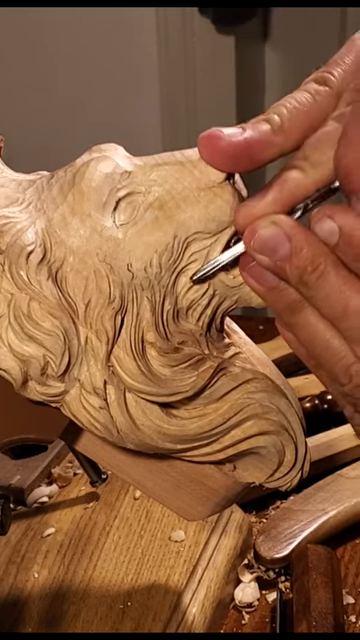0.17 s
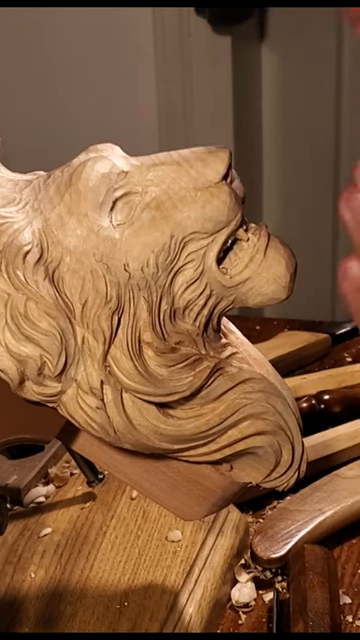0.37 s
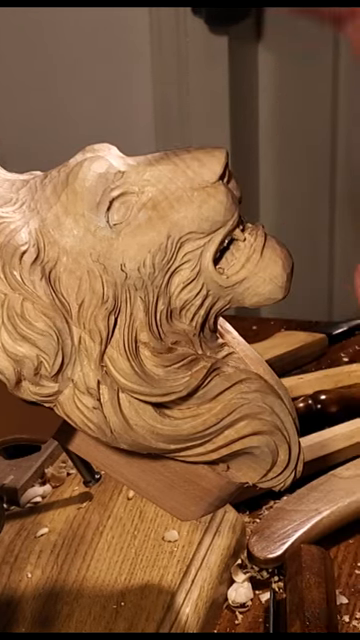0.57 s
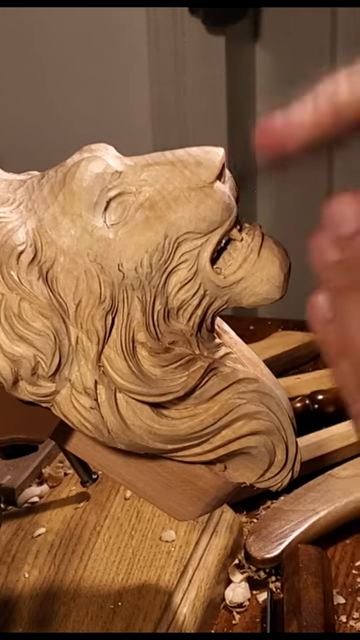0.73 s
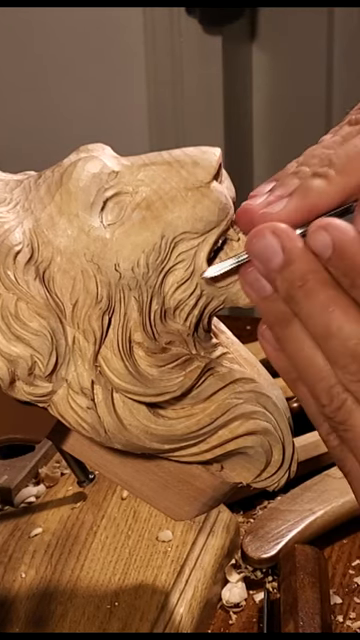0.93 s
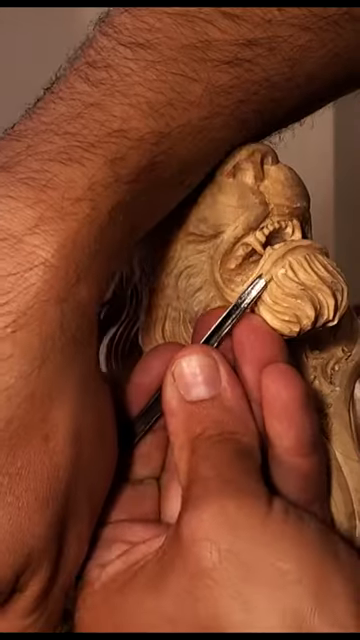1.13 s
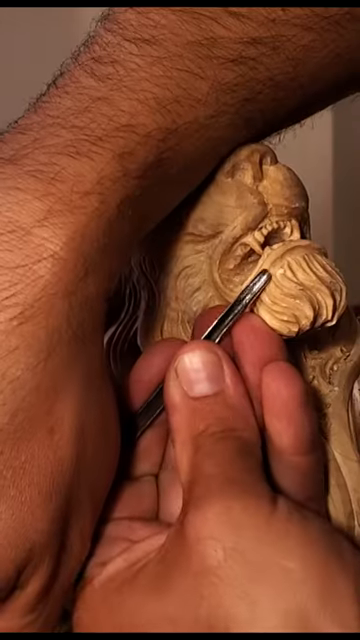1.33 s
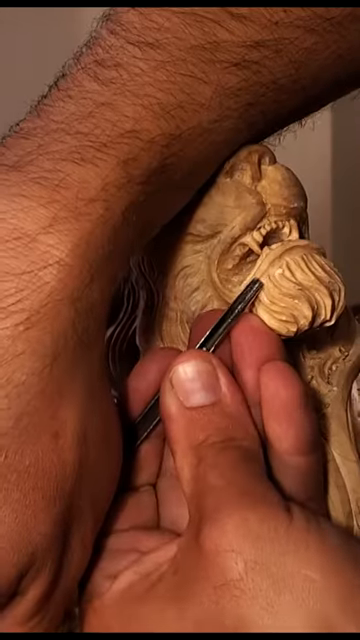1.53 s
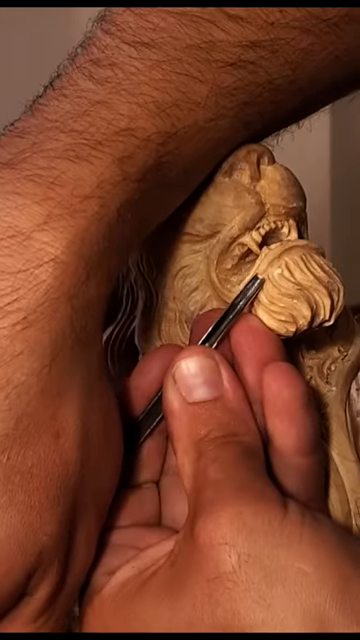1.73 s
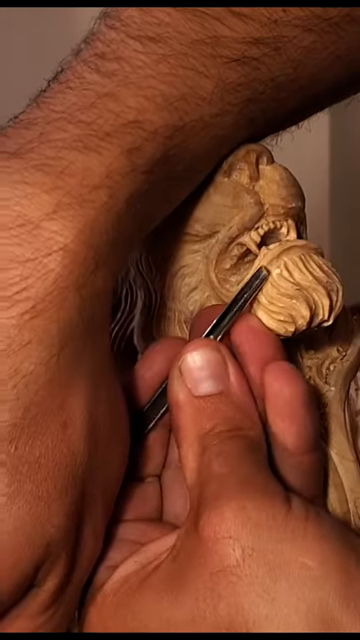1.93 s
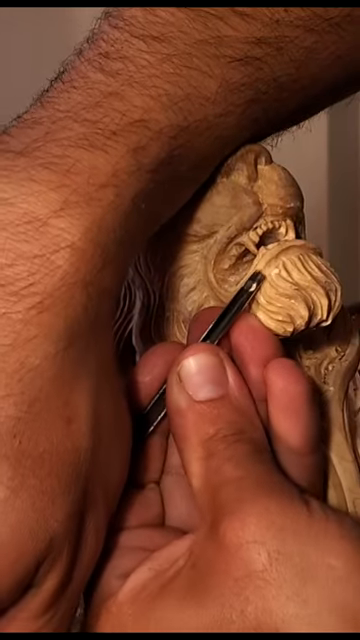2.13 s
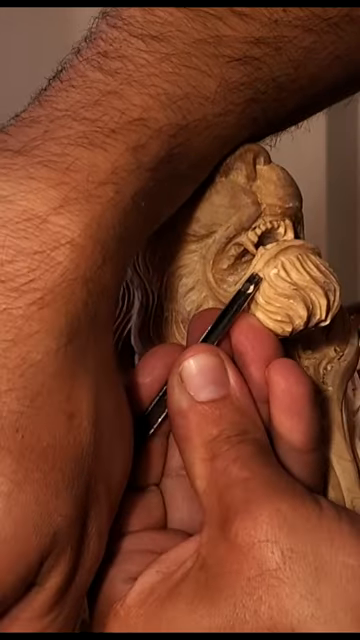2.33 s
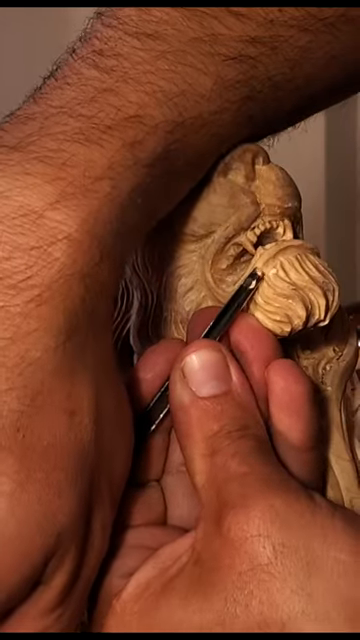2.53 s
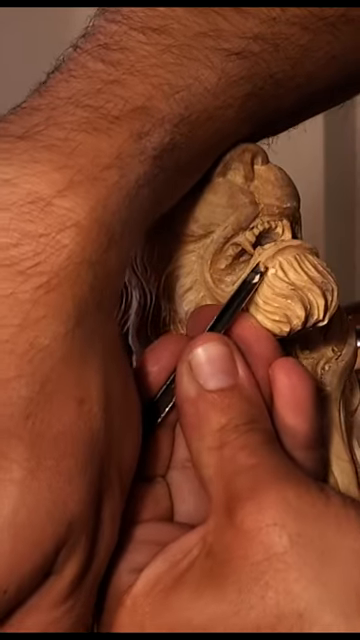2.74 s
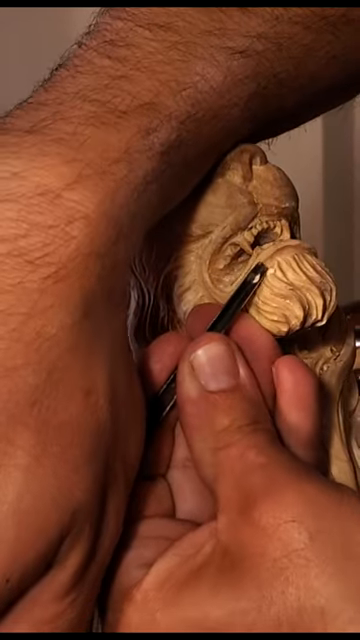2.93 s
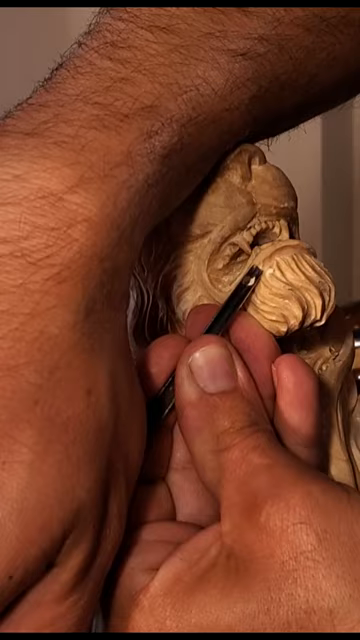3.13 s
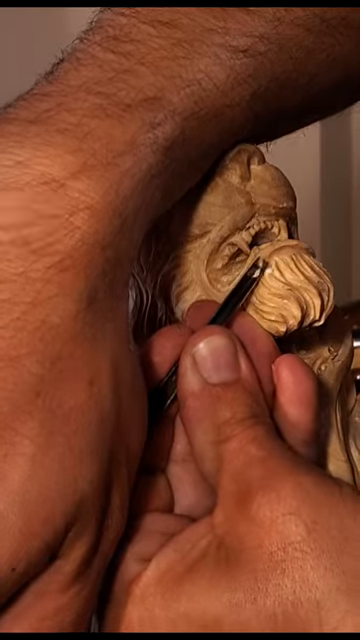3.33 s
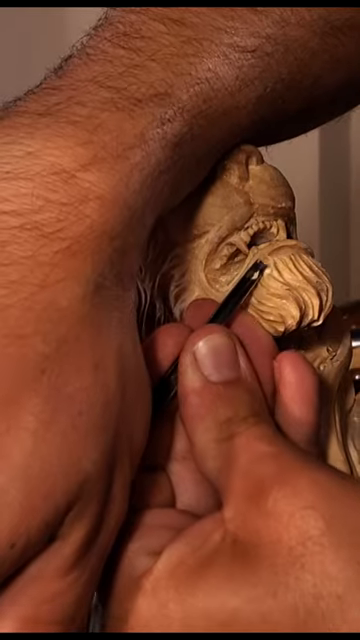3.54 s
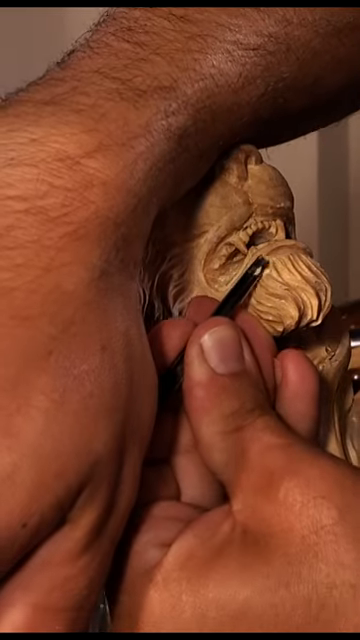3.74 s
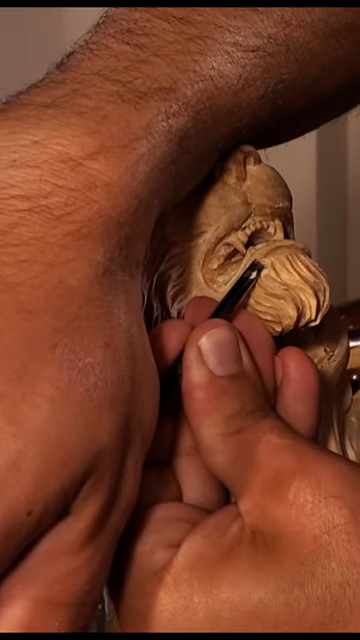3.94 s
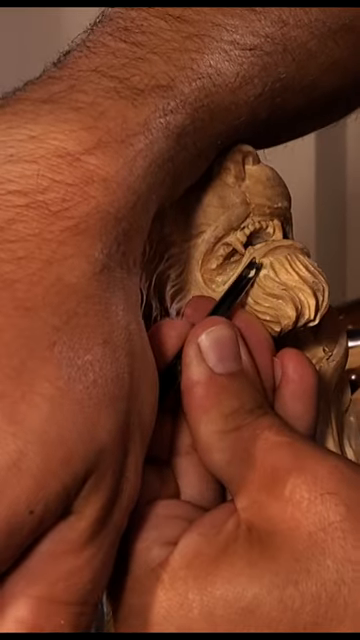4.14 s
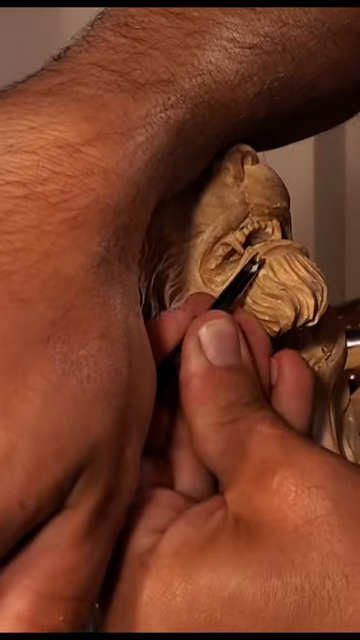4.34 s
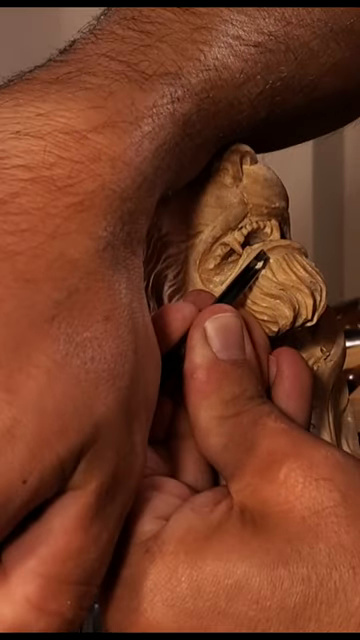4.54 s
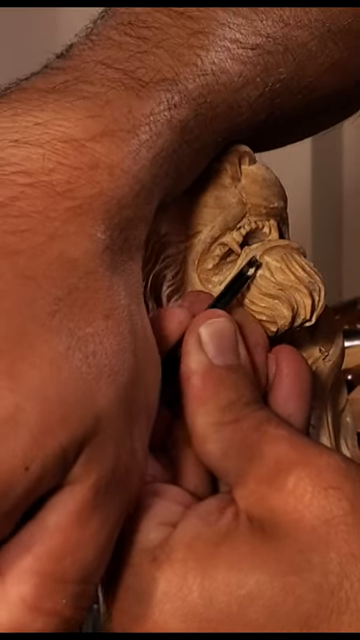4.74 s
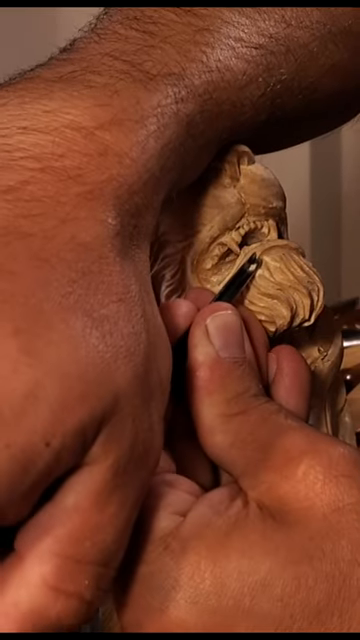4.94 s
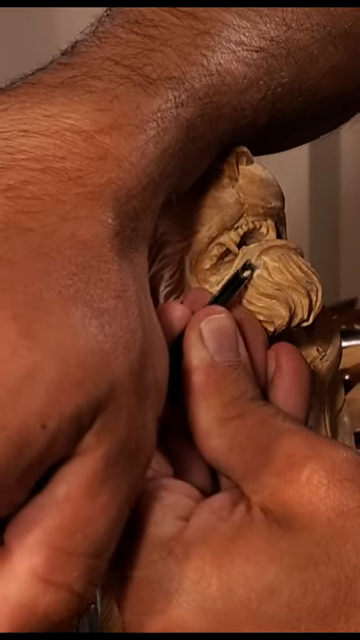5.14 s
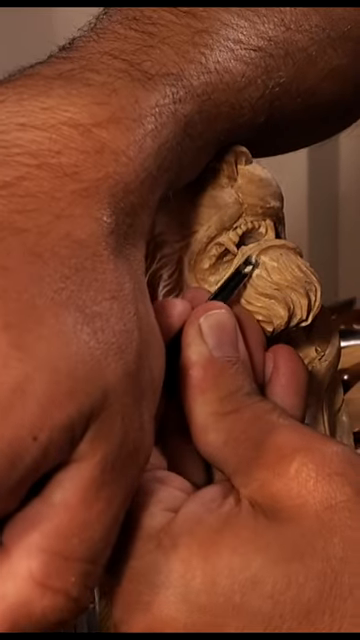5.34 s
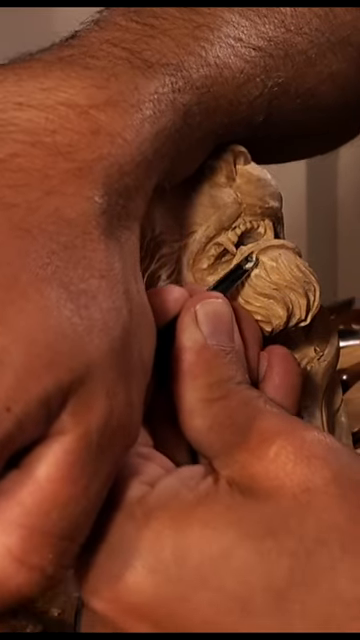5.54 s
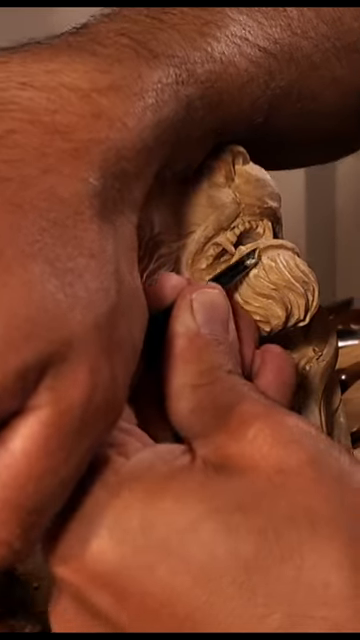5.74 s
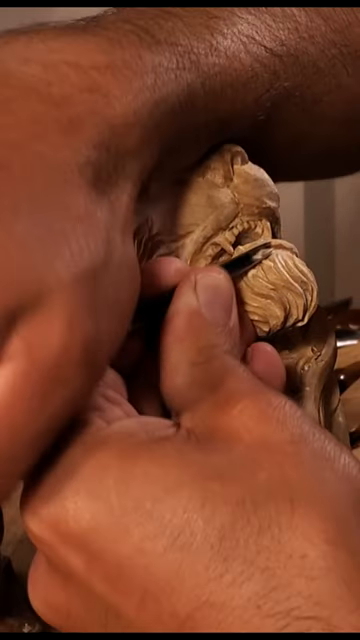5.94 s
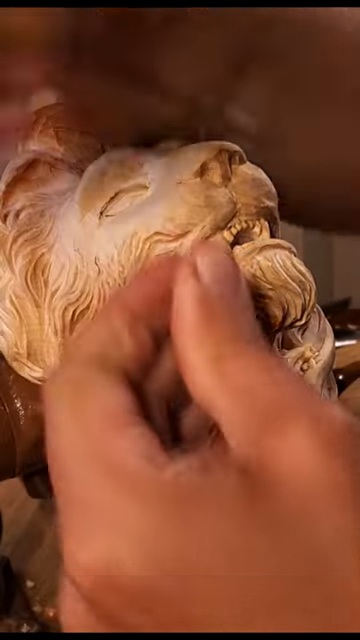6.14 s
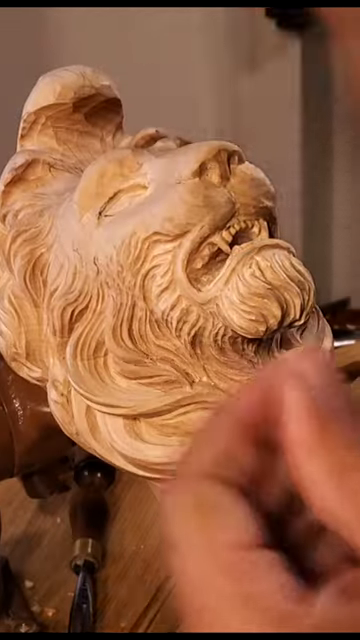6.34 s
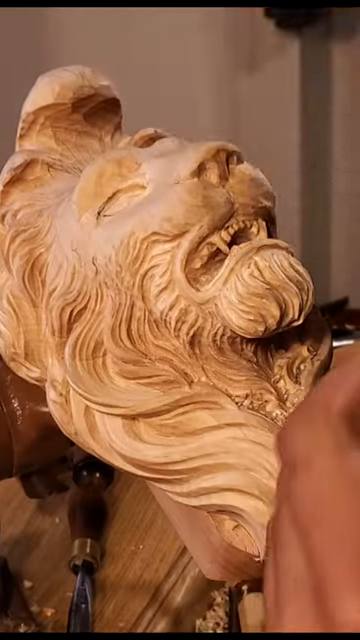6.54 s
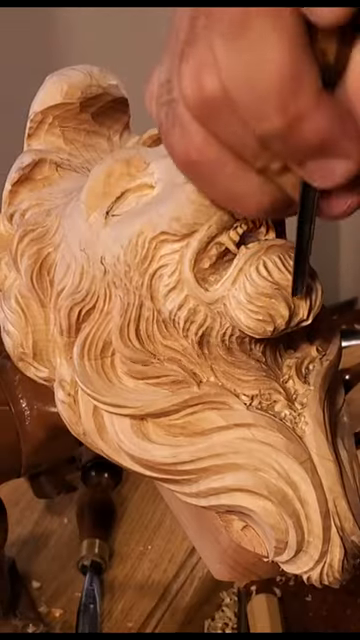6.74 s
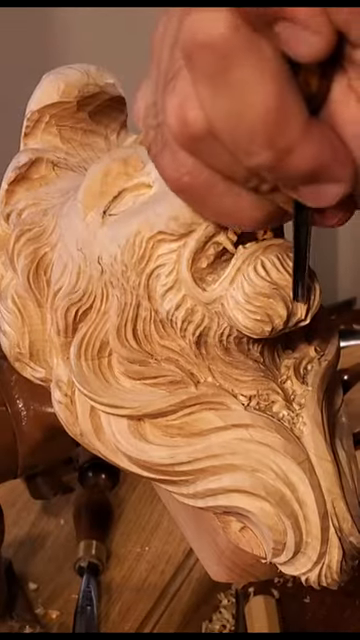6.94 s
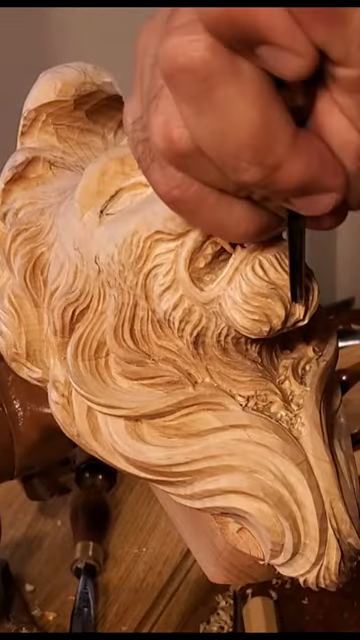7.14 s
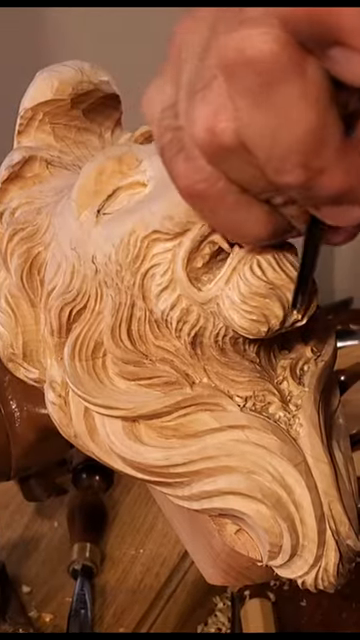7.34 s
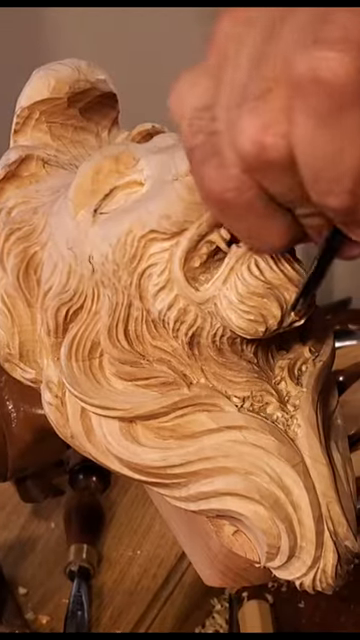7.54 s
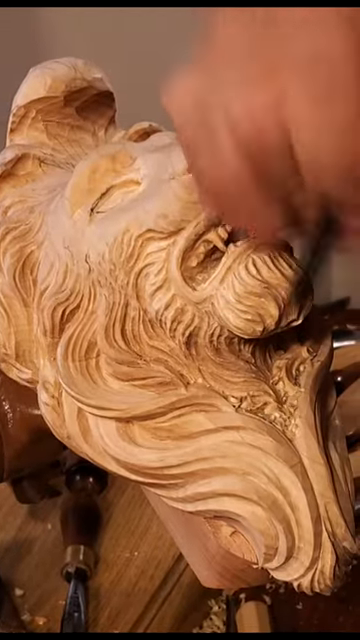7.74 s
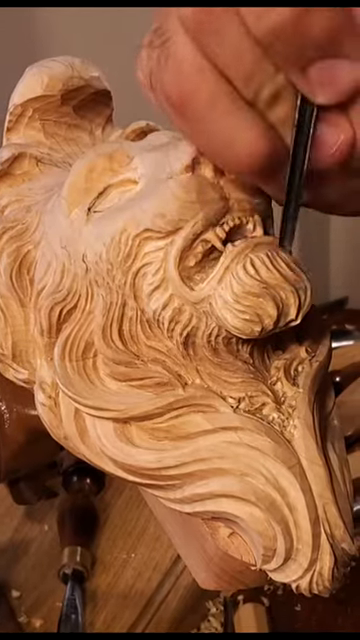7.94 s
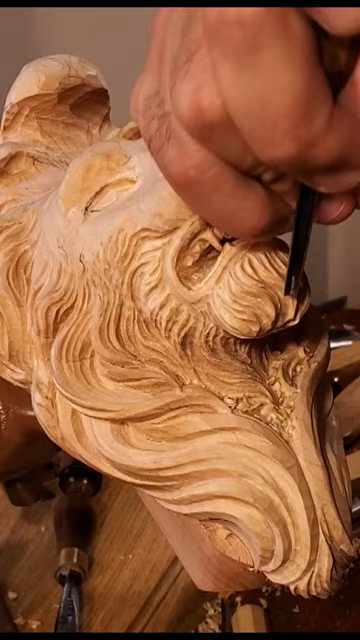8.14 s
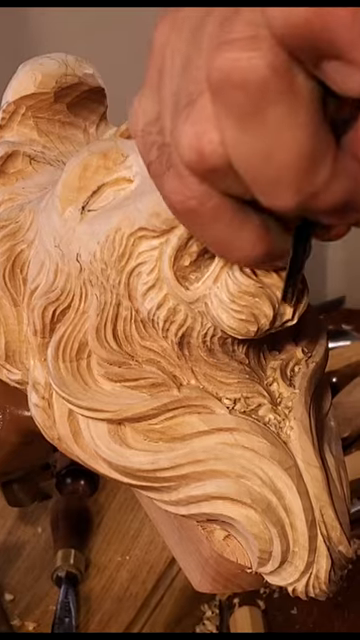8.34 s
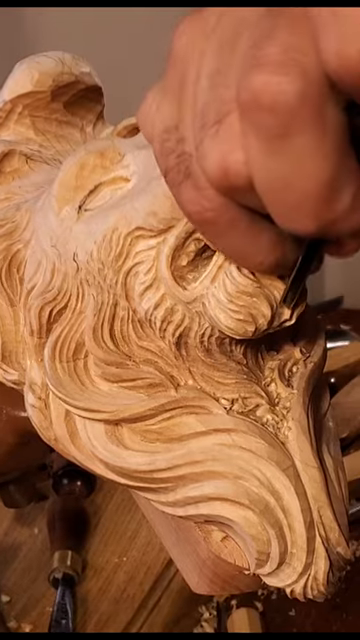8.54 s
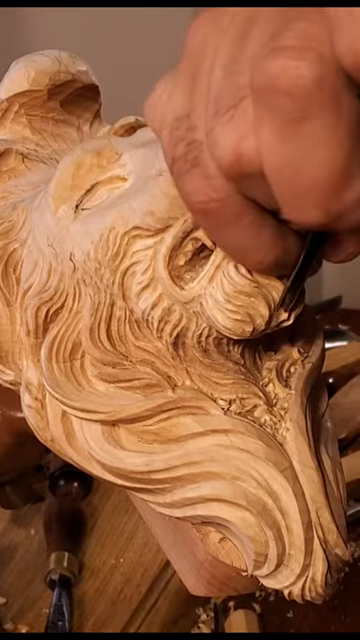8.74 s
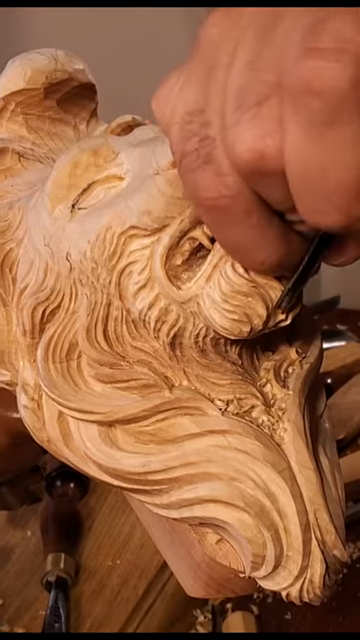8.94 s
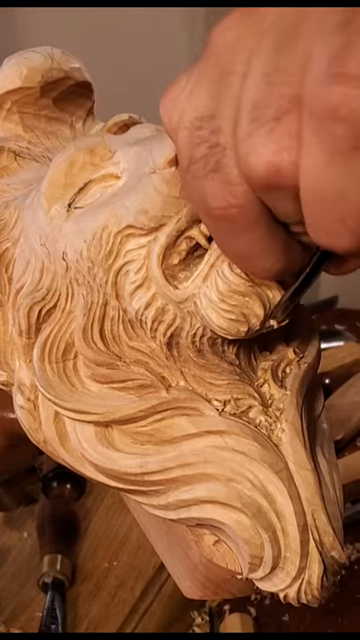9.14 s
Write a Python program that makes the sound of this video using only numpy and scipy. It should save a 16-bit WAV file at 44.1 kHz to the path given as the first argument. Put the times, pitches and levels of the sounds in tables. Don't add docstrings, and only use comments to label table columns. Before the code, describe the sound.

Very close to the microphone in a small quiet room, a hand gouge scrapes through a carved wooden block. After a brief opening rub and a pause, short gritty cuts come in irregular bursts, with tearing fibres and dull bench thumps. A clear tap interrupts around five seconds; cutting then strengthens, stops for soft handling clicks, and returns with a few sharp, abrupt bites.

```python
import sys
import numpy as np
from scipy import signal
from scipy.fft import rfft, irfft, next_fast_len
from scipy.io import wavfile
from scipy.ndimage import uniform_filter1d, map_coordinates

SR = 44100
rng = np.random.default_rng(int(sys.argv[2]) if len(sys.argv) > 2 else 0)


def volts_from_db(level):
    exponent = np.asarray(level, float) / 20
    return 10 ** exponent


def unload_audio(sound):
    columns = np.transpose(np.atleast_2d(sound))
    steps = np.round(np.clip(columns, -1, 1) * 32767)
    wavfile.write(sys.argv[1], SR, steps.astype(np.int16))


N = 409688

TURNS_S = [
    1.0,
    6.7,
]


def unit(x):
    return x / np.sqrt(np.mean(x ** 2) + 1e-20)


def along(points, hz):
    point_hz, value = np.transpose(points)
    return np.interp(np.log(hz + 1), np.log(point_hz + 1), value)


def filtered(x, response):
    size = next_fast_len(N + SR // 2)
    return irfft(rfft(x, size) * response(np.fft.rfftfreq(size, 1 / SR)), size)[..., :N]


def wobble(rate_hz):
    knots = rng.standard_normal(int(N * rate_hz / SR) + 4)
    return map_coordinates(knots, [np.arange(N) * rate_hz / SR])


def clock():
    return np.arange(0, N / SR + .002, .001)


def glide(levels):
    return np.interp(np.arange(N) / SR * 1000, np.arange(len(levels)), levels)


def setup():
    return np.searchsorted(TURNS_S, np.arange(N) / SR)


def resonate(force, setups, slope):
    f = np.fft.rfftfreq(2 ** 13, 1 / SR) + 1e-6

    def pole(centre_hz, width_hz):
        return 1 / (1 + 1j * (f * f - centre_hz * centre_hz) / (f * width_hz))

    out = np.zeros(N + SR)
    edges = [0, *(round(s * SR) for s in TURNS_S), N]
    for modes, a, b in zip(setups, edges, edges[1:]):
        response = 0
        for j, (hz, width_hz, db) in enumerate(modes):
            response = response + (-1) ** j * volts_from_db(db) * pole(hz, width_hz) * pole(hz, slope * hz)
        h = irfft(response)
        out[a:b + len(h) - 1] += signal.oaconvolve(force[a:b], h / np.linalg.norm(h))
    return out[:N]


def hush():
    # frequency [Hz], density [dB per Hz].
    hush_spectrum = [(15, -29), (30, 0), (64, 1.5), (150, -7), (300, -12.5), (700, -19), (1500, -24.5),
                     (4000, -27), (10000, -29), (16000, -30)]
    return volts_from_db(-70.5) * unit(filtered(rng.standard_normal(N), lambda hz: volts_from_db(along(hush_spectrum, hz))))


def effort(lag_s=0, rings_db_s=2000):
    # bite [s], hardest [s], release [s per 30 dB],
    # bite level [dB], hardest level [dB].
    surges = [(0.016, 0.06, 0.1, -73, -61.5), (0.258, 0.282, 0.1, -80, -71),
              (1.152, 1.263, 0.0757, -66, -54), (1.672, 1.694, .4, -72, -65),
              (1.7, 1.774, 0.15, -60, -52.5), (1.823, 1.979, 0.05, -59.5, -45.5),
              (2.411, 2.665, .5, -65, -53), (2.756, 2.823, 0.0569, -55.5, -47.5),
              (3.203, 3.385, 0.0769, -66, -46), (3.752, 3.8, 0.08, -68, -62), (4.159, 4.215, .25, -61, -56),
              (4.288, 4.304, 1, -58, -55), (4.358, 4.45, 0.13, -56.5, -52.5), (4.535, 4.554, .05, -67, -60),
              (4.906, 4.969, 0.13, -71, -63), (5.272, 5.405, 0.3, -68, -55.5),
              (5.5, 5.546, 0.5, -67.5, -60.5), (5.598, 5.708, 0.34, -61, -50),
              (5.807, 5.908, 0.1, -57.5, -40), (7.188, 7.299, 0.15, -71, -51), (7.4, 7.449, .5, -75, -75),
              (7.609, 7.645, 0.17, -63, -39), (8.539, 8.586, 0.15, -75, -67.5),
              (8.68, 8.701, 0.19, -63.5, -56.5), (9.025, 9.09, .3, -56, -55.5),
              (9.098, 9.16, 0.06, -54, -39.5)]
    bite_s = 0.045
    t = clock()
    ends = [row[1] for row in surges[1:]] + [N / SR + 1]
    levels = []
    for (s, top, release, bite_db, db), end in zip(surges, ends):
        knots_s = (s - bite_s, s, top, top + lag_s, top + lag_s + 3 * release)
        surge_db = np.interp(t, knots_s, (-110, bite_db, db, db, db - 90))
        levels.append(np.where(t < end, surge_db, -110))
    fall_db = rings_db_s * t
    return glide(np.maximum.accumulate(np.max(levels, axis=0) + fall_db) - fall_db)


def depth():
    # time [s], wood over steel [dB].
    wood_over_steel = [(.07, 10), (.29, 2.5), (1.25, 2.5), (1.33, 13.5), (1.7, -0.5), (2.66, 6.5),
                       (2.83, -0.5), (3.4, 4), (3.8, -2.5), (4.3, 6.5), (4.58, 0), (5.4, 7.5), (5.9, 0),
                       (7.3, 5.5), (7.65, 2), (8.65, 6), (9.03, -5), (9.2, -5.5)]
    return np.interp(np.arange(N) / SR, *np.transpose(wood_over_steel))


def fibres(rate_hz, spread_db, smooth):
    hits = rng.random(N) < rate_hz / SR
    snaps = hits * volts_from_db(spread_db * rng.exponential(size=N)) * rng.standard_normal(N)
    return unit(unit(snaps) + smooth * rng.standard_normal(N))


def tearing(t60_s):
    # time [s], peak [dB].
    tears = [(1.1667, -47), (1.7419, -48), (1.7654, -46), (1.95, -42), (2.4528, -48), (2.7282, -46),
             (2.7571, -44), (2.8145, -40), (1.8856, -41), (1.97, -44), (2.564, -38), (2.6, -33.5),
             (2.6514, -33), (2.7906, -40), (3.2246, -50), (3.254, -46), (3.3064, -44), (3.3503, -36),
             (3.365, -33.5), (4.1909, -48), (5.3637, -46), (4.156, -48), (4.2974, -36), (4.36, -39),
             (5.694, -35), (5.7169, -40), (5.8566, -40), (5.7902, -34), (5.819, -36), (5.874, -41),
             (5.894, -39), (7.22, -41), (7.276, -29), (7.321, -33.5), (7.632, -27), (7.6785, -36),
             (8.6941, -48), (9.127, -33.5)]
    jumps = np.zeros(N)
    for s, db in tears:
        jumps[round(s * SR)] = volts_from_db(db - 22.5)
    t = np.arange(SR // 4) / SR
    decay = volts_from_db(-60 * t / t60_s) * (1 - np.exp(-t / 0.0008))
    return np.abs(signal.oaconvolve(jumps, decay)[:N])


def shifting(x, depth_db):
    z = signal.stft(x, nperseg=512)[2]
    field = uniform_filter1d(rng.standard_normal(z.shape), size=5, axis=0)
    field = uniform_filter1d(field, size=12, axis=1)
    return signal.istft(z * volts_from_db(depth_db * unit(field)), nperseg=512)[1][:N]


def gouge():
    # centre [Hz], width [Hz], level [dB].
    edge_modes = [
        [(3900, 700, -4), (6230, 710, -3), (7550, 860, -0.5)],
        [(1702, 46, 8.5), (2850, 130, -7), (3300, 300, -7), (3720, 260, -2), (4020, 300, -2), (4420, 300, -2),
         (4800, 280, -1), (5080, 200, -1.5), (5480, 230, -1.5), (5840, 270, 1), (6760, 150, -13),
         (7300, 260, -8)],
        [(2780, 130, -3), (3260, 200, -5), (3750, 150, -1), (4030, 130, -1), (4450, 300, -3), (4950, 100, 0),
         (6090, 670, -5.5), (7400, 110, -1), (7470, 440, -6)],
    ]
    # centre [Hz], width [Hz], level [dB].
    sizzle_modes = [
        [(8000, 300, -8), (9500, 700, 7), (12500, 1500, -3.5), (14800, 1500, -10)],
        [(7850, 300, -1), (8650, 450, -2), (9590, 350, 0), (10760, 800, -8), (12440, 800, -7),
         (13300, 700, -12), (14700, 800, -9)],
        [(8300, 83, -1.5), (9460, 380, 1), (10280, 1200, -0.5), (12120, 320, -1.5), (13000, 400, -1.3),
         (14700, 240, -2)],
    ]
    # centre [Hz], width [Hz], level [dB].
    block_modes = [
        [(650, 260, 2.5), (1550, 103, -2.5), (2100, 190, -10.5)],
        [(541.6, 81, 3.5), (764, 126, 3), (899, 50, 2), (1122, 131, -1), (1480, 140, -28), (2310, 100, -26)],
        [(567, 47, 1), (710, 66, -23), (980, 46, -2.5), (1152, 95, 1), (1440, 133, -7), (1990, 130, -26)],
    ]
    sizzle_db, sizzle_growth = (0.5, -18.5, -7.5), 0.19
    edge_db = effort()
    block_db = effort(lag_s=0.0089, rings_db_s=453) + depth()
    clumps = volts_from_db(.8 * wobble(25) + 2.2 * wobble(90) - 5)
    grain = fibres(rate_hz=3000, spread_db=2.0, smooth=1.3)
    tears = tearing(t60_s=0.079)
    edge_force = (volts_from_db(edge_db) * clumps + tears) * grain
    block_force = (volts_from_db(block_db) * clumps + 0.44 * tears) * grain
    bright = volts_from_db(np.take(sizzle_db, setup()) + sizzle_growth * (np.maximum(edge_db, -70) + 49))
    ringing = resonate(edge_force, edge_modes, slope=0.7)
    ringing += resonate(edge_force * bright, sizzle_modes, slope=0.24)
    ringing += resonate(block_force, block_modes, slope=0.55)
    return shifting(ringing, depth_db=2.36)


def bench():
    # time [s], rocking [dB], swell [s], fade [s per 20 dB].
    leans = [(.005, -48, .05, .04), (.09, -39, 0.05, .09), (.18, -50, .05, .12), (.3, -52.5, 0.066, 0.21),
             (1.13, -44.5, 0.038, 0.2), (1.26, -40.5, 0.12, 0.27), (1.8, -49.5, 0.095, 0.3),
             (1.9, -45, .08, 0.13), (2.0, -43.5, .05, .18), (2.46, -51, 0.05, 0.33),
             (2.57, -41, 0.065, 0.21), (2.72, -43, .1, .2), (2.82, -47, .08, 0.23), (3.3, -44, 0.077, .1),
             (3.42, -43.5, .07, .16), (3.92, -63, 0.21, .4), (4.36, -38, .2, 0.28), (4.98, -50, .07, 0.33),
             (5.2, -59, .05, 0.5), (5.44, -43.5, 0.13, 0.16), (5.76, -53, 0.17, 0.2), (5.95, -52, .12, .12),
             (6.15, -56, 0.087, .1), (7.3, -42.5, .1, 0.17), (7.45, -44, .12, 0.19), (7.63, -42, .05, .08),
             (7.705, -27.5, 0.04, 0.14), (7.96, -51, .06, 0.06), (8.41, -54, 0.065, 0.2),
             (8.59, -48, .12, 0.2), (8.76, -45.5, 0.094, 0.1), (8.96, -43.5, 0.063, 0.2),
             (9.16, -29.5, 0.08, 0.06), (9.25, -48, .05, .1)]
    # centre [Hz], width [Hz], level [dB].
    board_modes = [
        [(179, 20, -17), (275, 21, 8), (347, 25, -23), (420, 23, 0)],
        [(188.8, 29.7, 1), (270.7, 21.5, 1.5), (307.3, 39, -3.5), (387, 17.4, -1.5), (472, 63, -12.5),
         (562, 69, -13), (762, 300, -23.5)],
        [(199.5, 9.1, -3), (265, 16.4, -3.5), (325.1, 10.9, 3.5), (385, 14.4, -3), (445, 66, -12),
         (596, 84, -16.5), (728, 600, -21.5)],
    ]
    # centre [Hz], width [Hz], level [dB].
    leg_modes = [
        [(132, 36, 0)],
        [(137.1, 16.3, 3.5), (154.7, 60, -8)],
        [(139.7, 42, -0.5), (110, 15, -2.5)],
    ]
    shake_modes = [(30.2, 17, -6.0), (48, 12, -15.5), (69.9, 17, 7), (101, 14, -8)]
    boards_db, legs_db = (3, 0, -1), (-5, -5, -9)
    t = clock()
    levels = []
    for s, db, swell, fade in leans:
        rise = ((s - t) / swell) ** 2
        fall = ((t - s).clip(0) / fade) ** 1.29
        levels.append(db - 20 * np.where(t < s, rise, fall))
    rocking_db = glide(np.max(levels, axis=0))
    turns = np.cumsum(71.6 + 2.604 * wobble(9)) / SR
    rocking = volts_from_db(rocking_db + 2.2 + 1.0 * wobble(18)) * np.sin(2 * np.pi * turns)
    shake = resonate(volts_from_db(rocking_db - 9) * rng.standard_normal(N), [shake_modes] * 3, slope=.8)

    push_db = effort(lag_s=0.027, rings_db_s=330) + depth() + 45
    boards = volts_from_db(np.take(boards_db, setup()) + 1.027 * push_db - 45) + volts_from_db(rocking_db - 19.5)
    legs = volts_from_db(np.take(legs_db, setup()) + 0.77 * push_db - 44.5) + volts_from_db(rocking_db - 17.5)
    shove = volts_from_db(0.98 * wobble(30)) * rng.standard_normal(N)
    rumble = resonate(legs * shove, leg_modes, slope=.6) + resonate(boards * shove, board_modes, slope=0.69)
    return rocking + shake + rumble


def spray(contacts, octaves, t60_s, rise_s, bend):
    out, t = np.zeros(N + SR), np.arange(SR // 3) / SR
    f = np.fft.rfftfreq(len(t), 1 / SR) + 1
    decay = volts_from_db(-60 * (t / t60_s) ** bend) + 1.6 * volts_from_db(-60 * t / 0.0093)
    shape = decay * (1 - np.exp(-(t / rise_s) ** 2))
    for s, db, hz in contacts:
        band = np.exp(-.5 * (np.log2(f / hz) / octaves) ** 2)
        burst = irfft(rfft(rng.standard_normal(len(t))) * band, len(t)) * shape
        out[round(s * SR):][:len(t)] += volts_from_db(db - 9) * unit(burst) * shape.std()
    return out[:N]


def ticks():
    # time [s], peak [dB], centre [Hz].
    clicks = [
        (.0243, -52, 9300),
        (.276, -57, 5770),
        (4.88, -65, 13000),
        (5.989, -62, 11000),
        (8.24, -68, 4540),
        (8.365, -66, 5200),
        (8.534, -64, 4000),
        (8.5804, -54, 4700),
        (5.157, -42, 4600),
        (6.2495, -50, 6000),
    ]
    slaps = [
        (1.0993, -54, 745),
        (4.022, -64, 2540),
        (6.2502, -48.5, 6150),
        (6.452, -56, 2000),
        (8.889, -67, 4000),
    ]
    taps = [
        (1.1005, -59, 4960),
        (4.02, -59, 1200),
        (5.157, -45, 4000),
        (5.161, -50.5, 1600),
        (5.165, -58, 420),
        (8.365, -68, 1180),
        (9.0225, -47, 1294),
        (9.022, -56, 2100),
    ]
    rings = [
        (.04, -59, 1550),
        (.274, -63, 4350),
        (6.2508, -57, 4600),
        (7.21, -39.5, 332),
    ]
    thuds = [(4.038, -41, 208), (4.95, -35, 138), (1.79, -33, 140), (1.89, -32, 140), (5.42, -34, 140),
             (7.74, -30.5, 138), (5.17, -36, 160), (6.458, -34.5, 199), (6.51, -40, 200), (6.5, -38.5, 126),
             (1.098, -45, 246), (1.098, -47.5, 500), (5.165, -40.5, 280), (5.21, -41, 223), (6.1, -47, 140),
             (4.41, -30.5, 137), (4.5, -38, 140), (6.17, -52, 250), (6.465, -47, 90), (7.68, -29.5, 140),
             (4.04, -45, 110)]
    brushes = [(8.88, -61, 3600), (7.77, -43, 560), (7.87, -55, 500), (.27, -48, 270), (9.125, -39, 1300),
               (7.45, -54.5, 1160), (8.74, -54, 1280), (8.54, -58, 1050), (5.38, -42, 250),
               (4.5, -45.5, 280), (6.11, -62, 2600), (6.1, -53, 1200), (6.1, -59, 9600), (6.11, -52, 490),
               (6.45, -52, 376)]
    scrapes = [(9.125, -35.5, 3700), (6.11, -58, 5600), (6.1, -57, 3500), (6.45, -51, 2600),
               (6.452, -53, 1900), (5.88, -46, 3200), (7.64, -45, 1800), (6.46, -58, 5200),
               (8.68, -56, 3100), (3.37, -44, 3400), (6.45, -54, 1100)]
    out = spray(clicks, octaves=0.49, t60_s=0.048, rise_s=.001, bend=1.01)
    out += spray(slaps, octaves=0.88, t60_s=0.17, rise_s=0.0017, bend=1.4)
    out += spray(taps, octaves=0.28, t60_s=0.24, rise_s=0.0017, bend=1.5)
    out += spray(rings, octaves=0.049, t60_s=0.2, rise_s=0.011, bend=1.4)
    out += spray(thuds, octaves=0.23, t60_s=0.22, rise_s=.016, bend=1.2)
    out += spray(brushes, octaves=.45, t60_s=.28, rise_s=0.028, bend=1.4)
    out += spray(scrapes, octaves=.22, t60_s=.18, rise_s=.025, bend=1.9)
    return out


def hums():
    # middle [s], peak [dB], pitch [Hz], half length [s].
    sung_modes = [(.07, -42, 270, .042), (.14, -48, 285, .025), (.305, -42.5, 272, .03),
                  (.09, -56, 680, .03), (.11, -57, 400, .04), (.39, -60, 280, .03), (2.63, -44, 387, .06),
                  (2.67, -44, 140, .03), (2.83, -48, 550, .025), (2.81, -49, 750, .025),
                  (2.71, -50, 900, .02), (5.62, -50, 850, .04), (5.7, -48, 1150, .03),
                  (5.7, -47, 800, .015), (5.79, -45, 135, .06), (5.93, -43, 565, .045),
                  (5.92, -40, 310, .03), (5.94, -43, 140, .04), (7.66, -35, 335, .03),
                  (7.71, -35, 270, .03), (7.72, -37, 400, .03), (7.67, -43, 1100, .03),
                  (7.67, -41, 980, .025), (7.68, -46, 600, .025), (7.81, -38, 275, .025),
                  (7.81, -43, 390, .02), (7.81, -54, 640, .03), (7.9, -52, 300, .05), (3.38, -46, 800, .04),
                  (8.6, -61, 1100, .035), (8.6, -54, 330, .035), (8.72, -53, 1100, .03),
                  (8.77, -59, 1480, .06), (8.73, -48, 330, .04), (8.82, -53, 320, .03),
                  (8.93, -67, 1550, .04), (8.92, -63, 1150, .03), (8.915, -69, 2770, .025),
                  (9.045, -52, 1170, .02), (9.11, -51, 1180, .025), (9.175, -41, 1430, .025),
                  (9.16, -43, 1010, .025), (9.165, -42, 400, .025), (9.21, -45, 370, .02),
                  (9.24, -56, 1450, .03), (4.45, -42, 138, .06), (4.57, -47, 135, .05),
                  (4.42, -47, 275, .025), (4.55, -51, 270, .05), (7.5, -56, 1200, .09)]
    width, steady_hz = .17, 620
    out = np.zeros(N + SR)
    chance = rng.standard_normal((len(sung_modes), 2, 100))
    for (s, db, hz, half_s), (a, b) in zip(sung_modes, chance):
        t = np.arange(-2 * half_s, 2 * half_s, 1 / SR)
        knots = [(t - t[0]) * hz * width]
        steady = steady_hz / hz
        rough = map_coordinates(a, knots) + 1j * map_coordinates(b, knots)
        feed = (steady + rough) / np.sqrt(steady ** 2 + 2)
        swell = volts_from_db(db) * np.exp(-np.abs(t / half_s) ** 2.6)
        start = max(round((s + t[0]) * SR), 0)
        out[start:start + len(t)] += swell * np.imag(feed * np.exp(2j * np.pi * hz * t))
    return out[:N]


def room(x):
    # frequency [Hz], t60 [s].
    room_t60 = [(200, 0.59), (700, 0.25), (2000, 0.25), (6000, 0.16), (14000, 0.16)]
    hz, t, z = signal.stft(rng.standard_normal(SR // 2), SR, nperseg=256)
    decay = volts_from_db(-60 * t / along(room_t60, hz)[:, None])
    tail = signal.istft(z * decay, SR, nperseg=256)[1]
    return signal.oaconvolve(np.pad(x, (200, 0)), tail / np.linalg.norm(tail))[:N]


def scene():
    tool = gouge() + ticks()
    mono = volts_from_db(3.0) * tool + volts_from_db(-6) * room(tool) + bench() + hush() + hums()
    return np.array([mono, mono])


def low_pass(x):
    return signal.sosfilt(signal.butter(12, 15780, fs=SR, output="sos"), x)


def record(dry):
    # frequency [Hz], density [dB per Hz].
    difference_spectrum = [(30, 6), (200, 1.5), (1000, -13), (3000, -9.5), (6000, -2.5), (9000, -2.5),
                           (12600, -1.5), (12800, -28)]
    top_hz = 15780
    noise = unit(filtered(rng.standard_normal(N), lambda hz: volts_from_db(along(difference_spectrum, hz))))
    bass = filtered(dry[0], lambda hz: 1 / (1 + (hz / 250) ** 2))
    difference = volts_from_db(-94) * noise + volts_from_db(-38.0) * wobble(20) * bass
    mix = filtered(dry + np.array([difference, -difference]), lambda hz: hz < top_hz)
    return low_pass(mix)


dry = scene()
out = record(dry)
unload_audio(out)
```